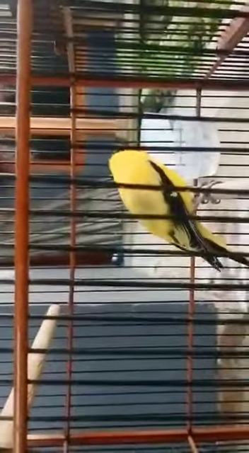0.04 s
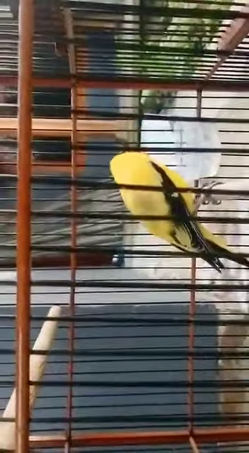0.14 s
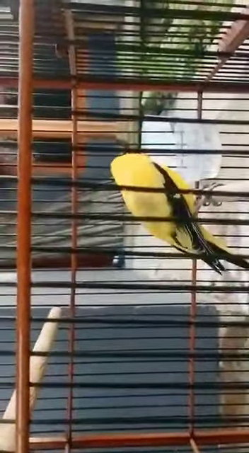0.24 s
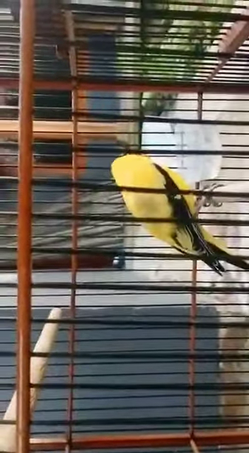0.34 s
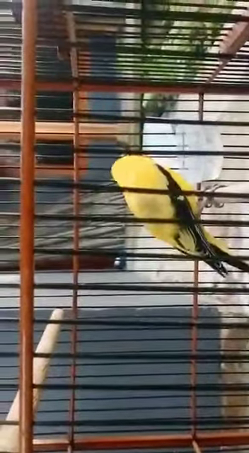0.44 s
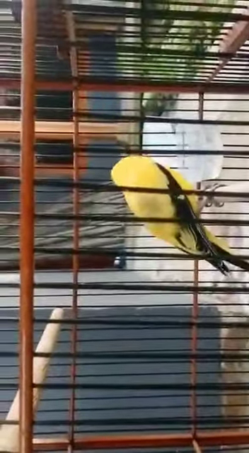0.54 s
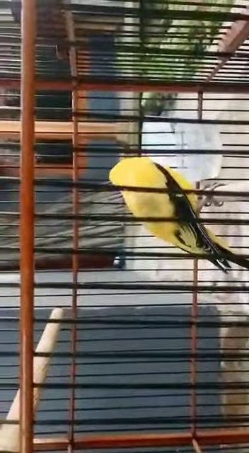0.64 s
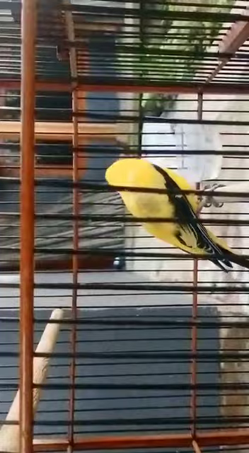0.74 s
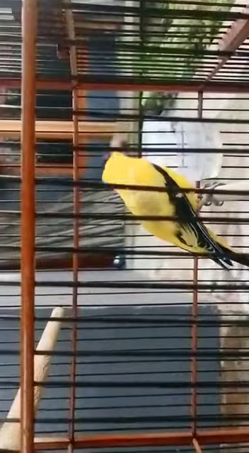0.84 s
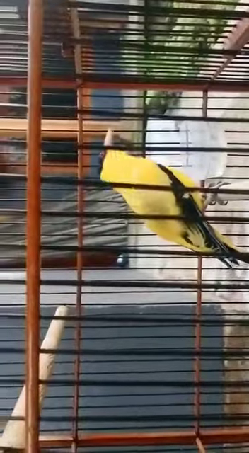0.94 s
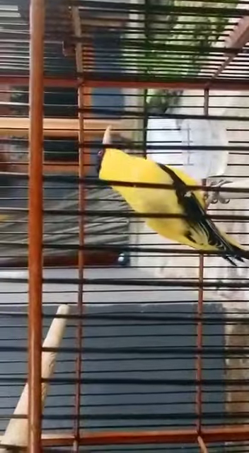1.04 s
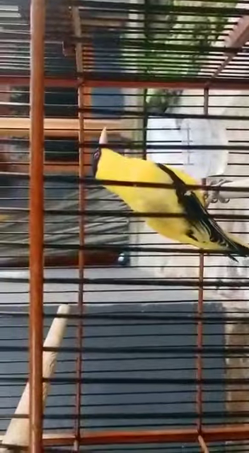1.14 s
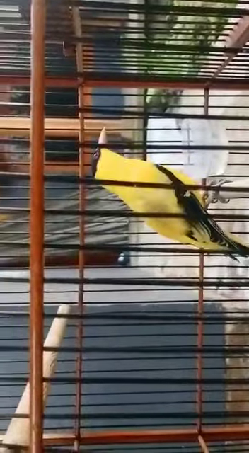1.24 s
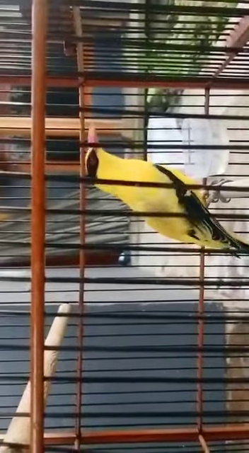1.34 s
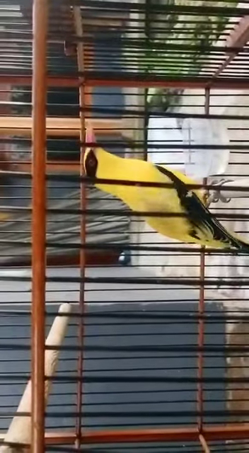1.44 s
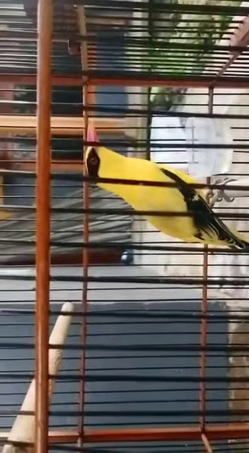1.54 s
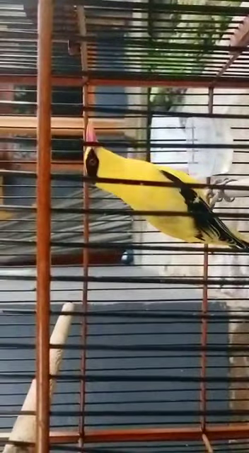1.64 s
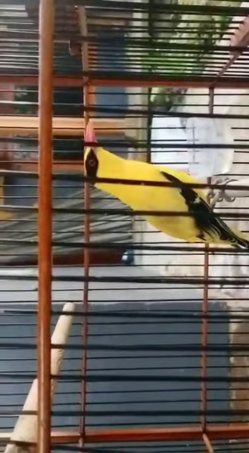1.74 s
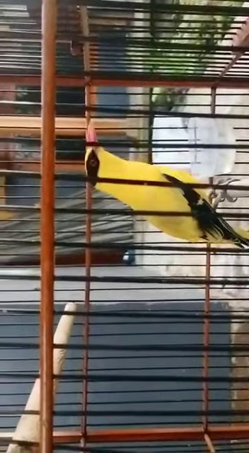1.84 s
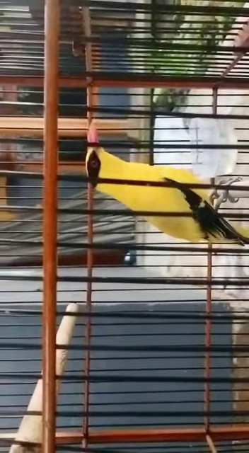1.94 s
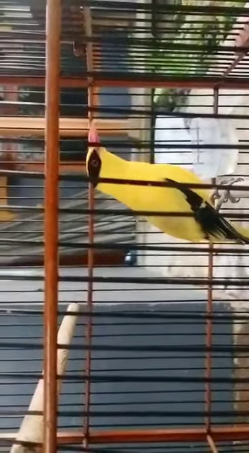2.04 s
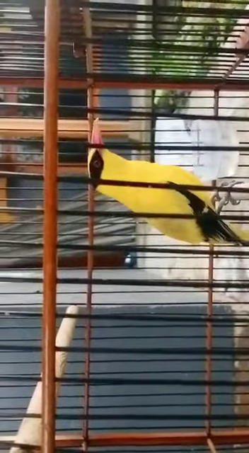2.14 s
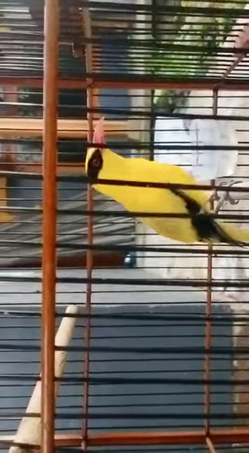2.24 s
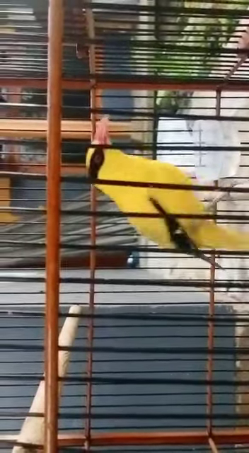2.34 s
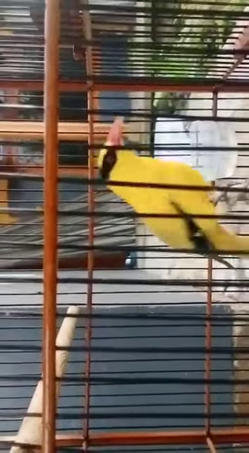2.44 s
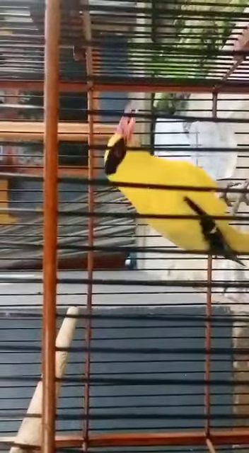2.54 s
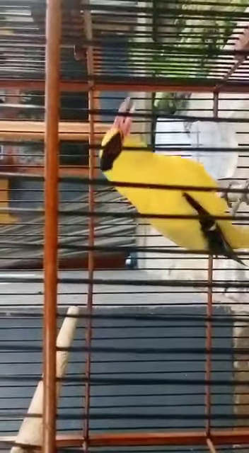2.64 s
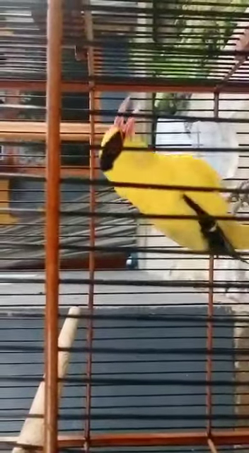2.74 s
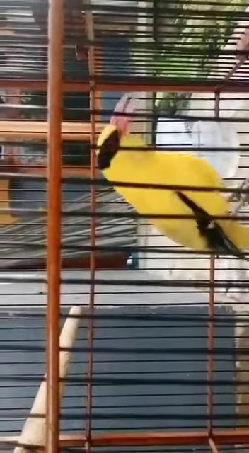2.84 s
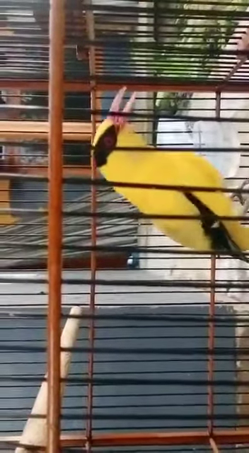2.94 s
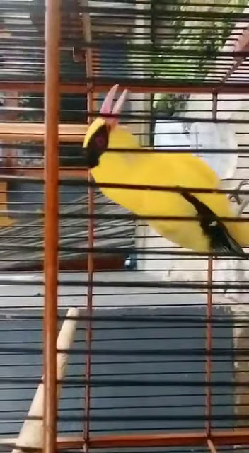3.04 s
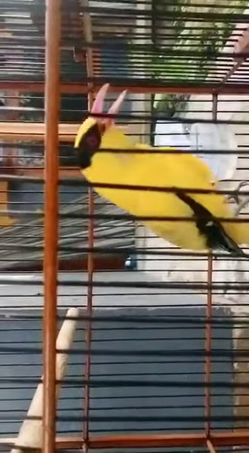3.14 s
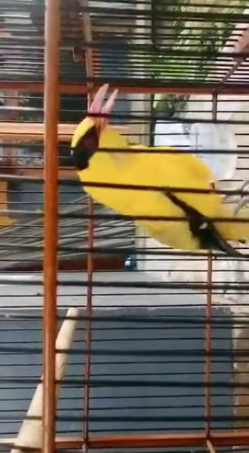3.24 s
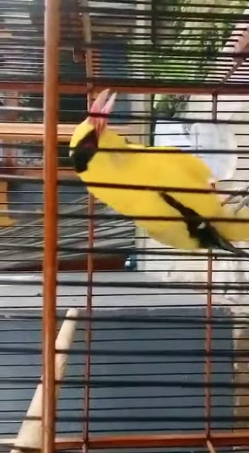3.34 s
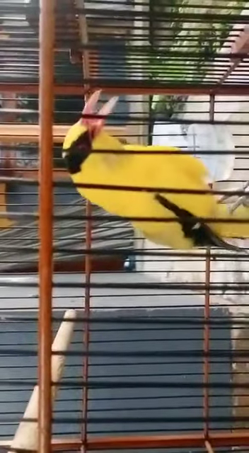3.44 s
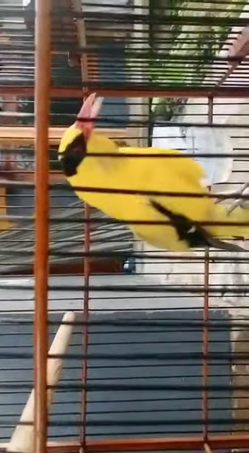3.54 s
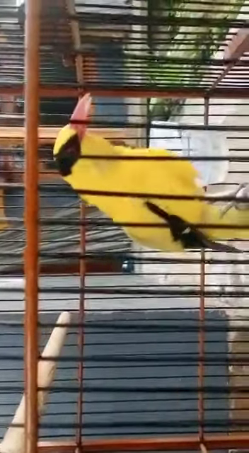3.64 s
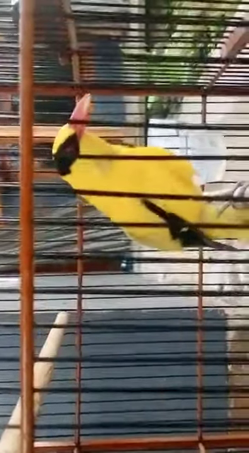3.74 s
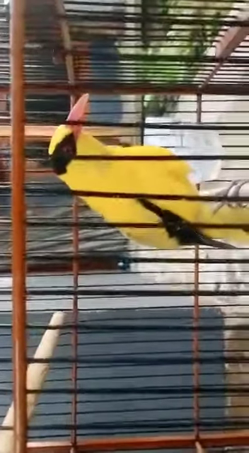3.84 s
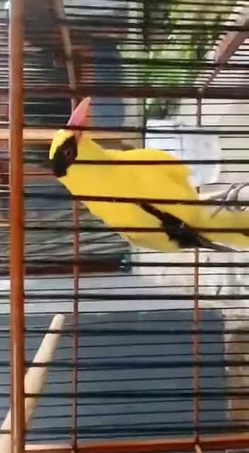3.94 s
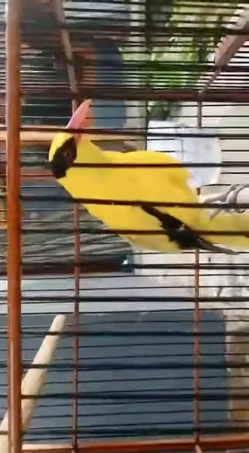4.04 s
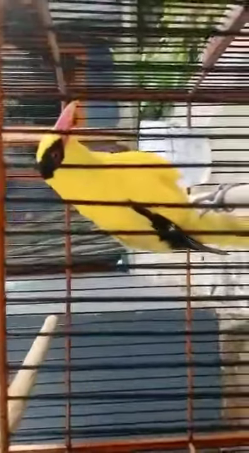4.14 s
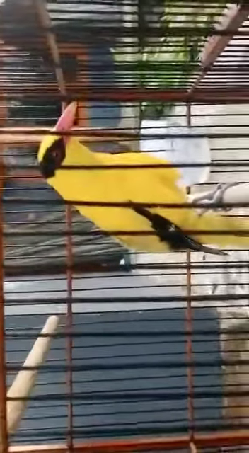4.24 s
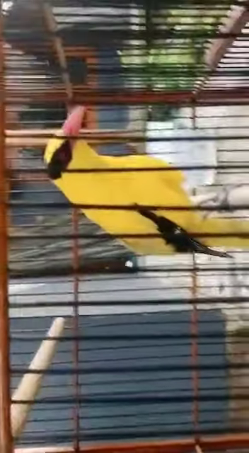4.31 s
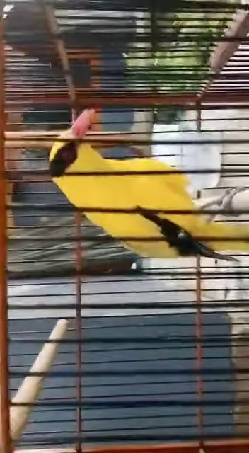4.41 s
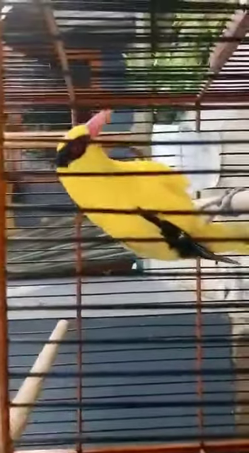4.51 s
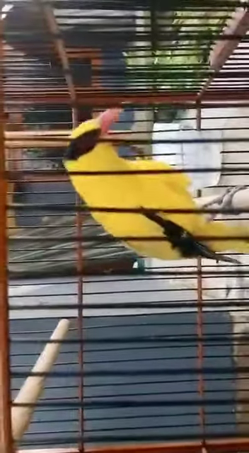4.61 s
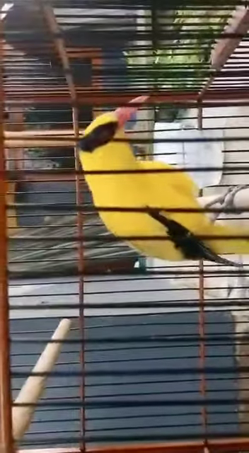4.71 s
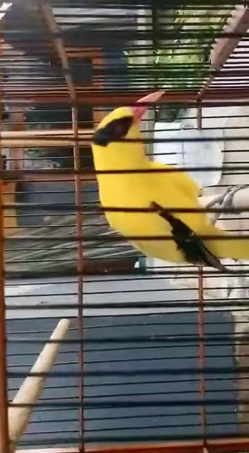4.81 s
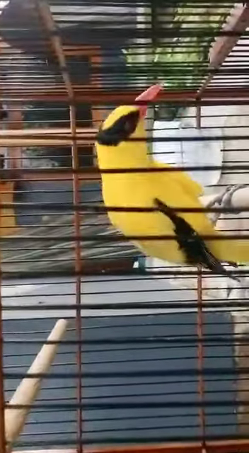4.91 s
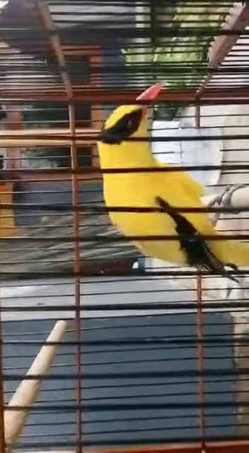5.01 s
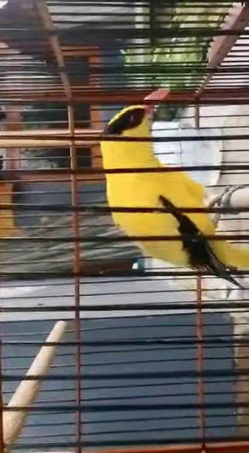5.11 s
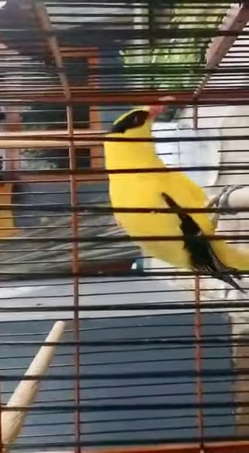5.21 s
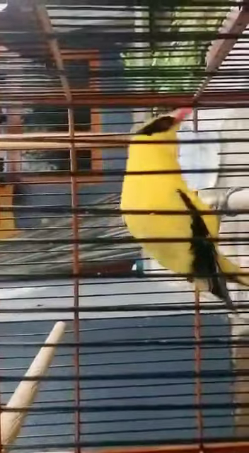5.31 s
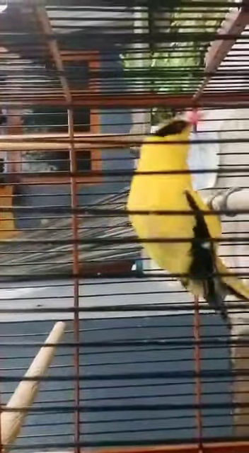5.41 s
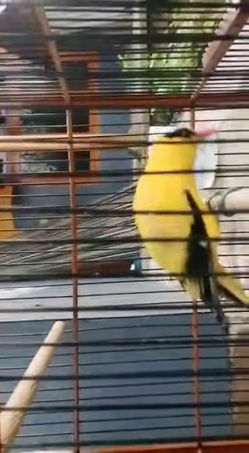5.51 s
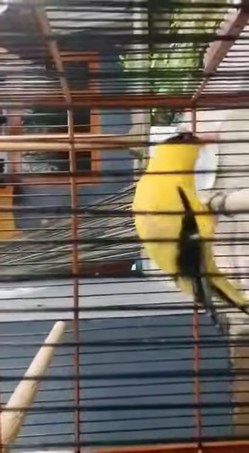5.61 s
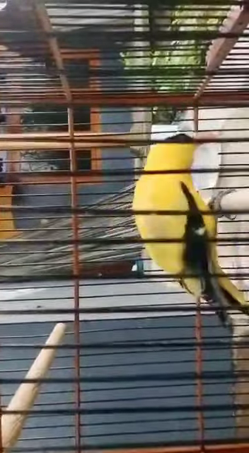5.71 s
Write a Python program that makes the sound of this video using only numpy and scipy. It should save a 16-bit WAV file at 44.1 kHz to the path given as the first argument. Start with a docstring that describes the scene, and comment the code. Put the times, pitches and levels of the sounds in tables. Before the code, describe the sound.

On a quiet porch, a dove coos softly in the background, a long rolled coo and a short one in turn. Midway, a caged oriole close to the microphone bursts into one loud fluty phrase, sliding up and down for about a second, with a slight porch echo. Tiny cage ticks and faint distant bird whistles dot the near silence.

```python
"""A porch: near the microphone a caged oriole whistles one loud fluty phrase with both sides of its syrinx,
near sines with faint overtones, rasp and a ringing windpipe. Behind it a dove coos softly, a rolled, falling
coo and a short one in turn: closed-beak tones, chopped where they roll. The cage ticks now and then in short
noise scratches. Wavering sine slurs make the whistles of far birds, and soft low tones and rising squeaks
around 1.5 s. A noise gate flutters on the faint outdoor hush of coloured noise."""
import sys
import numpy as np
from scipy import signal
from scipy.fft import rfft, irfft
from scipy.io import wavfile
from scipy.ndimage import uniform_filter1d, minimum_filter1d

SR = 44100
rng = np.random.default_rng(int(sys.argv[2]) if len(sys.argv) > 2 else 0)


def to_wav(s):
    """Save 16-bit WAV."""
    ch = np.atleast_2d(s).T  # columns
    pcm = np.round(np.clip(ch, -1, 1) * 32767)  # PCM
    wavfile.write(sys.argv[1], SR, pcm.astype(np.int16))


N = 254456


def amp(db):
    """Decibels to gain."""
    return 10 ** (np.asarray(db) / 20)


def unit(x):
    """Scales to rms 1."""
    return x / np.sqrt(np.mean(x ** 2) + 1e-20)


def read(points, hz):
    """Reads a spectrum on a log-frequency axis."""
    f, value = np.transpose(points)
    return np.interp(np.log(hz + 1), np.log(f + 1), value)


def follow(rows, t):
    """Reads every column of a curve table at the times t."""
    s, *columns = np.transpose(rows)
    return [np.interp(t, s, c) for c in columns]


def add(mix, s, sound):
    """Mixes a sound in at time s."""
    part = mix[max(round(s * SR), 0):][:len(sound)]
    part += sound[:len(part)]


def tinted(x, spectrum):
    """Gives a sound a colour and rms 1."""
    gain = amp(read(spectrum, np.fft.rfftfreq(len(x), 1 / SR)))
    return unit(irfft(rfft(x) * gain, len(x)))


def noise(spectrum, size):
    """Noise of rms 1 with the given colour."""
    return tinted(rng.standard_normal(size), spectrum)


def wander(rate_hz, size):
    """Smooth random motion, of rms 1 over two seconds, up to about the given rate."""
    hz = np.fft.rfftfreq(2 * SR, 1 / SR)
    spectrum = rfft(rng.standard_normal(2 * SR)) / (1 + (hz / rate_hz) ** 4)
    return unit(irfft(spectrum))[:size]


def soft_ends(t):
    """Fades a note in and out within a few milliseconds."""
    return np.clip(np.minimum(t - t[0], t[-1] - t) / 0.00301, 0, 1)


def resonate(x, hz, width):
    """A resonance of gain 1 that follows the curve hz: shifted to 0 Hz, smoothed and shifted back."""
    turn = np.exp(2j * np.pi * np.cumsum(hz) / SR)
    r = np.exp(-np.pi * width / SR)
    return 2 * (turn * signal.lfilter([1 - r], [1, -r], x / turn)).real


# Colour of the outdoor hush and microphone hiss. Each row: frequency in Hz, relative density in dB per Hz.
HUSH_COLOUR = [(25, -31), (60, -19.5), (110, 2), (165, 2), (260, -6), (700, -11.5), (1500, -16),
               (3800, -22), (4100, -12), (4400, -25.5), (6000, -29.5), (6900, -18), (8500, -38),
               (12000, -31), (15000, -24)]
HUSH_DB = -68


def hush():
    """Steady coloured noise: the air outdoors and the hiss of the microphone."""
    return amp(HUSH_DB) * noise(HUSH_COLOUR, N)


# Faint whistles and chirps: far birds' slurs, and soft low tones and rising squeaks around 1.5 s. Each row:
# start in seconds, length in seconds, first pitch in Hz, last pitch in Hz, level in dB before porch and mix.
FAINT_SLURS = [(0.023, 0.14, 3200, 2800, -81), (0.236, 0.15, 4550, 4350, -81.5),
               (0.872, 0.15, 3000, 2740, -75.5), (1.446, 0.039, 2150, 3040, -67.5),
               (1.452, 0.036, 2950, 3600, -68.5), (1.46, 0.026, 1600, 2200, -72),
               (1.469, .17, 608, 572, -72.5), (1.489, 0.14, 720, 710, -64.5),
               (1.545, 0.022, 1390, 2220, -64), (1.7, 0.15, 2780, 2900, -80.5),
               (2.843, .22, 2940, 3297, -63), (4.248, 0.16, 3300, 2720, -79.5),
               (4.517, 0.127, 2984, 2750, -76.5), (4.71, .11, 3186, 2860, -76),
               (4.87, .22, 3002, 2544, -81)]


def faint_whistles():
    """All the faint slurs, tones and squeaks."""
    whistles = np.zeros(N)
    for row in FAINT_SLURS:
        add(whistles, *faint_slur(*row))
    return whistles


def faint_slur(s, length, first_hz, last_hz, level_db, waver=0.014):
    """A short sine slur whose pitch wavers at random."""
    size = round(length * SR)
    hz = np.linspace(first_hz, last_hz, size) * (1 + waver * wander(130, size))
    tone = np.sin(2 * np.pi * np.cumsum(hz) / SR)
    return s, amp(level_db) * tone * signal.windows.tukey(size, .5)


# Small ticks of claws and wire. Each row: start in seconds, level in dB before the trim, ring in Hz.
CAGE_TICKS = [(0.6491, -55.5, 3000), (1.0411, -55, 1920), (1.071, -56.5, 1920), (1.809, -57, 1070),
              (2.297, -51.5, 1260), (3.8192, -54, 1212), (4.449, -54, 1856)]


def cage():
    """All the ticks of the cage."""
    ticks = np.zeros(N)
    for row in CAGE_TICKS:
        add(ticks, *tick(*row))
    return ticks


def tick(s, level_db, hz, t60=0.088, rise=0.00061, trim_db=-7.0, ring_db=14.0):
    """A short noise scratch that dies away, coloured by the wire that it shakes."""
    t = np.arange(SR // 6) / SR
    colour = [(150, -8), (hz * 0.87, 0), (hz, ring_db), (hz * 1.3, -2),
              (4000, -5), (5300, 0), (6500, -7), (16000, -10)]
    decay = amp(level_db + trim_db - 60 * t / t60)
    return s, decay * (1 - np.exp(-t / rise)) * noise(colour, len(t))


# The dove's second partial. Each row: frequency in Hz, level in dB relative to the tone.
DOVE_SECOND_PARTIAL = [(650, -12), (850, -28), (930, -22.5), (1030, -44.5), (1200, -36.5)]
ROLL_HZ = 27.15  # mean rate
ROLL_BEND = .07  # share of the pitch


def coo(rows, jitter=0.0036, roll_spread=0.15, roll_chop=0.53, rough=0.87):
    """A closed-beak tone of two partials; an uneven roll chops it and flicks its pitch up."""
    t = np.arange(rows[0][0], rows[-1][0], 1 / SR)
    hz, level_db, depth = follow(rows, t)
    roll = 2 * np.pi * np.cumsum(ROLL_HZ * (1 + roll_spread * wander(16, len(t)))) / SR
    flick = np.cos(roll) + np.cos(2 * roll) / 2
    bend = 1 + ROLL_BEND * depth * flick + jitter * wander(60, len(t))
    phase = 2 * np.pi * np.cumsum(hz * bend) / SR
    tone = np.sin(phase) + amp(read(DOVE_SECOND_PARTIAL, 2 * hz)) * np.sin(2 * phase)
    chop = 1 + depth * (roll_chop * np.sin(roll) + rough * wander(74, len(t)))
    return t[0], amp(level_db) * chop * tone * soft_ends(t)


# a long coo opens with a roll that climbs and grows
ROLL_TOP_HZ, ROLL_CLIMB_HZ_PER_S, ROLL_GROWTH_DB_PER_S, ROLL_DEPTH = 498, 180, 29, .85
# clear notes sag in pitch and swell towards their end; the roll flares up at each change of note
HIGH_HZ, HIGH_DB, MIDDLE_HZ, MIDDLE_DB = 570, -46, 553, -41
CREST_HZ, CREST_DB, CREST_LEAD_S = 542.3, -38.0, 0.073
LOW_HZ, LULL_HZ, LULL_DB, SWELL_HZ, SWELL_S = 476, 453, -58.5, 433.7, .11
LEAP_S, DROP_S, FLARE_DEPTH, LULL_DEPTH = .008, .025, 0.45, 0.11
SIGH_S, DYING_HZ_PER_S, DYING_DB = .06, 840, -70.0


def long_coo(start, leap, drop, swell, end, roll_db, drop_db, swell_db,
             ease_db=-5.5, ease_hz=9.0, sigh_db=-14.0, sigh_hz=40.0):
    """A climbing roll, a leap to a clear high note, then a lower note that swells and dies away."""
    roll = leap - start
    first_hz = ROLL_TOP_HZ - ROLL_CLIMB_HZ_PER_S * roll
    last_hz = SWELL_HZ - DYING_HZ_PER_S * (end - swell)
    # each row: time in seconds, pitch in Hz, level in dB, depth of the roll
    return coo([(start, first_hz, roll_db - ROLL_GROWTH_DB_PER_S * roll, ROLL_DEPTH),
                (leap - LEAP_S, ROLL_TOP_HZ, roll_db, ROLL_DEPTH),
                (leap, HIGH_HZ, HIGH_DB, FLARE_DEPTH),
                ((leap + drop - CREST_LEAD_S) / 2, MIDDLE_HZ, MIDDLE_DB, 0),
                (drop - CREST_LEAD_S, CREST_HZ, CREST_DB, 0),
                (drop - DROP_S, CREST_HZ - ease_hz, CREST_DB + ease_db, 0),
                (drop, LOW_HZ, drop_db, FLARE_DEPTH),
                (swell - SWELL_S, LULL_HZ, LULL_DB, LULL_DEPTH),
                (swell, SWELL_HZ, swell_db, 0),
                (swell + SIGH_S, SWELL_HZ - sigh_hz, swell_db + sigh_db, FLARE_DEPTH),
                (end, last_hz, DYING_DB, FLARE_DEPTH)])


# a short coo starts on a brief higher accent
ACCENT_HZ, ACCENT_DB, ACCENT_S, ACCENT_DIP_DB = 596.5, -40.5, 0.0344, -45
SHORT_CREST_HZ, SHORT_CREST_DB, SHORT_LEAD_S, SHORT_EDGE_HZ, SILENT_DB = 538, -43, 0.032, 250, -74


def short_coo(leap, drop, end, roll_db=-56.0):
    """A quick rise to an accent, the sagging high note, and a brief fading roll."""
    return coo([(leap - SHORT_LEAD_S, SHORT_EDGE_HZ, SILENT_DB, ROLL_DEPTH),
                (leap - LEAP_S, ROLL_TOP_HZ, roll_db, ROLL_DEPTH),
                (leap, ACCENT_HZ, ACCENT_DB, LULL_DEPTH),
                (leap + ACCENT_S, ACCENT_HZ, ACCENT_DB, LULL_DEPTH),
                (leap + ACCENT_S + DROP_S, HIGH_HZ, ACCENT_DIP_DB, LULL_DEPTH),
                (drop - DROP_S, SHORT_CREST_HZ, SHORT_CREST_DB, 0),
                (drop, ROLL_TOP_HZ, roll_db, FLARE_DEPTH),
                (end, LOW_HZ, SILENT_DB, FLARE_DEPTH)])


# The dove's long coos. Each row: start in seconds, leap to the high note in seconds, drop to the low note in
# seconds, last swell in seconds, end in seconds, top of the roll in dB, drop in dB, last swell in dB.
DOVE_LONG_COOS = [(0, 0.22, 0.46, .805, .97, -55.5, -52, -46.5),
                  (2.111, 2.559, 2.795, 3.115, 3.27, -52.5, -58.5, -43.5),
                  (4.51, 5.002, 5.205, 5.47, 5.57, -52, -55, -49)]
# Its short coos. Each row: leap in seconds, drop in seconds, end in seconds.
DOVE_SHORT_COOS = [(1.745, 1.91, 2.01), (4.148, 4.32, 4.43)]


def dove():
    """Long and short coos in turn."""
    coos = np.zeros(N)
    for row in DOVE_LONG_COOS:
        add(coos, *long_coo(*row))
    for row in DOVE_SHORT_COOS:
        add(coos, *short_coo(*row))
    return coos


# Overtones let through by throat and open beak. Each row: frequency in Hz, level in dB relative to the tone,
# before the brightness of the note.
THROAT_COLOUR = [(1600, -8), (2000, -26), (2450, -37), (2900, -44.5), (3350, -36.5), (4200, -54),
                 (4900, -47), (5750, -42), (7100, -46.5), (8600, -56), (11200, -49), (12200, -56),
                 (13200, -45), (15400, -46)]
# Colour of the rasp. Each row: frequency in Hz, relative level in dB.
RASP_COLOUR = [(100, -33.5), (400, -22.5), (900, -3.5), (1750, 4), (2600, -4), (4100, -28), (5000, -19.5),
               (7400, -20), (8800, -27.5), (10500, -21.5), (12000, -28), (13400, -13), (15500, -21.5)]
JITTER, STRAIN_JITTER = .0014, .045  # share of the pitch: always, and added per unit of rasp
# the windpipe's resonance sinks as the neck stretches
PIPE_SHORT_HZ, PIPE_LONG_HZ, STRETCH_AT_S, STRETCH_S = 7340, 5990, 3.02, .05


def whistle(t, hz, level_db, bright_db, harsh_db, pipe_db,
            flutter_db=7.5, pipe_width_hz=680.0, pipe_rasp_db=12.5):
    """One side of the syrinx: a near sine with faint overtones, unsteady and raspy when pressed."""
    shake = (JITTER + STRAIN_JITTER * amp(harsh_db)) * wander(300, len(t))
    phase = 2 * np.pi * np.cumsum(hz * (1 + shake)) / SR
    overtones = np.zeros(len(t))
    for k in range(2, 22):
        unsteady_db = flutter_db * (1 - 1 / k) ** 2 * wander(50, len(t))  # high overtones flicker most
        gain = amp(read(THROAT_COLOUR, k * hz) + bright_db + unsteady_db)
        overtones += gain * (k * hz < SR / 2) * np.sin(k * phase)
    # air escapes in puffs, once a cycle
    puffs = rng.standard_normal(len(t)) * (1 + np.cos(phase))
    rasp = amp(harsh_db) * tinted(puffs, RASP_COLOUR) / 2
    # the windpipe rings at one high pitch, sharpened by passing the resonance twice
    stretch = 1 / (1 + np.exp((t - STRETCH_AT_S) / STRETCH_S))  # 1 for a short neck, 0 for a long one
    pipe_hz = PIPE_LONG_HZ + (PIPE_SHORT_HZ - PIPE_LONG_HZ) * stretch
    pipe = overtones + amp(pipe_rasp_db) * rasp
    for _ in range(2):
        pipe = resonate(pipe, pipe_hz, pipe_width_hz)
    sound = np.sin(phase) + overtones + rasp + amp(pipe_db) * pipe
    return t[0], amp(level_db) * sound * soft_ends(t)


def note(start, length, first_hz, last_hz, arch_hz, level_db, swell_db, attack, release,
         bright_db, harsh_db, pipe_db):
    """A short whistle: one arched glide that swells or fades between attack and release."""
    t = np.arange(0, length, 1 / SR)
    u = t / length
    hz = first_hz + (last_hz - first_hz) * u + arch_hz * np.sin(np.pi * u)
    opening = np.clip(np.minimum(t / attack, (length - t) / release), 0, 1)
    s, sound = whistle(start + t, hz, level_db + swell_db * (u - .5), bright_db, harsh_db, pipe_db)
    return s, sound * np.sin(np.pi / 2 * opening) ** 2


# a fast glide strains the voice: brighter and raspier; low notes are raspier too
HALF_STRAIN_OCT_PER_S = 3.8
SLUR_DB, SLUR_PIPE_DB = 4, 2
CALM_OVERTONES_DB, STRAIN_OVERTONES_DB = -4.5, 6.0
CALM_RASP_DB, STRAIN_RASP_DB, RASP_DB_PER_OCT, CLEAR_HZ = -60.0, 28.0, 19.0, 1400
# soft passages are purer; only the windpipe keeps ringing
FULL_VOICE_DB, PURER_DB_PER_DB = -18.5, 0.9
# The voice cracks where the bird presses hardest or jumps in pitch. Each row: centre in seconds, half length
# in seconds, rasp in dB, windpipe in dB.
VOICE_CRACKS = [(2.672, .038, -24.5, 13.5), (3.368, .012, -28, 11), (3.449, 0.01, -7.5, 9)]


def slur(rows):
    """A long whistle whose colour follows its loudness and the speed of its glide."""
    t = np.arange(rows[0][0], rows[-1][0], 1 / SR)
    hz, level_db = (uniform_filter1d(c, size=180, mode="nearest") for c in follow(rows, t))
    speed = uniform_filter1d(abs(np.gradient(np.log2(hz))) * SR, size=500)  # octaves per second
    strain = speed ** 2 / (speed ** 2 + HALF_STRAIN_OCT_PER_S ** 2)
    purity_db = PURER_DB_PER_DB * np.maximum(FULL_VOICE_DB - level_db, 0) * (1 - strain)
    bright_db = CALM_OVERTONES_DB + STRAIN_OVERTONES_DB * strain - purity_db
    harsh_db = CALM_RASP_DB + STRAIN_RASP_DB * strain + RASP_DB_PER_OCT * np.log2(CLEAR_HZ / hz)
    pipe_db = SLUR_PIPE_DB + purity_db
    for s, half_length, rasp_db, ring_db in VOICE_CRACKS:
        crack = np.exp(-((t - s) / half_length) ** 4)
        harsh_db = harsh_db + crack * (rasp_db - harsh_db)
        pipe_db = pipe_db + crack * (ring_db - pipe_db)
    return whistle(t, hz, level_db + SLUR_DB, bright_db, harsh_db, pipe_db)


# The oriole's short notes. Each row: start in seconds, length in seconds, # first pitch in Hz, last pitch in
# Hz, arch in Hz, level in dB, swell in dB, attack in seconds, release in # seconds, overtones in dB, rasp in
# dB, windpipe in dB.
SHORT_NOTES = [(2.639, .034, 1576, 1407, 0, -16, -3, 0.013, 0.01, -4, -23.5, 13),
               (2.839, 0.071, 950, 1300, -270, -35.5, 12, 0.0045, 0.0078, -14.5, -45, 12.5),
               (2.884, 0.05, 1550, 1376, 15, -18.5, 0, 0.031, 0.025, -17, -47, 13),
               (2.958, .066, 1236, 1095, 30, -9, 0, .03, .018, -4.5, -50.5, -3.5),
               (3.018, 0.11, 1130, 1108, 5, -27, -18.5, 0.013, 0.0095, -15, -43.5, 12)]
# The long whistles. Each row: time in seconds, pitch in Hz, level in dB before the slur's gain.
# the opening whistle, which climbs and swells
OPENING_WHISTLE = [(2.574, 1630, -48.5), (2.582, 1637, -34.5), (2.618, 1671, -45), (2.638, 1824, -38.5),
                   (2.652, 1881, -24.5), (2.662, 1934, -26), (2.674, 1904, -16), (2.692, 1871, -17),
                   (2.738, 1851, -39.5)]
# a softly held whistle that swells and falls; rows as above: seconds, Hz, dB
FALLING_WHISTLE = [(3.023, 1509, -53), (3.031, 1511, -35), (3.053, 1506, -28), (3.103, 1502, -30),
                   (3.133, 1498, -23.5), (3.163, 1490, -8), (3.193, 1430, -8), (3.217, 1344, -22.5),
                   (3.223, 1325, -14.5), (3.251, 1135, -11.5), (3.277, 959, -17.5), (3.285, 887, -26.5),
                   (3.3, 790.7, -54.5)]
# a whistle that rises in two steps; rows as above: seconds, Hz, dB
RISING_WHISTLE = [(3.308, 581.1, -48), (3.324, 655, -37.5), (3.336, 853, -27), (3.36, 880, -21),
                  (3.372, 1103, -16), (3.38, 1254, -20.5), (3.386, 1352, -10), (3.402, 1381, -7),
                  (3.43, 1390, -6), (3.446, 1396, -27.5), (3.452, 1400, -22.5)]
# the last whistle, which falls and levels out; rows as above: seconds, Hz, dB
LAST_WHISTLE = [(3.447, 1421, -29), (3.457, 1378, -11.5), (3.469, 1303, -11), (3.481, 1258, -17),
                (3.497, 1206, -10), (3.527, 991, -15.5), (3.577, 840.3, -18), (3.599, 824.8, -18),
                (3.679, 807.5, -21), (3.689, 770, -29.5), (3.704, 692, -41.5)]


def song(sum_db=-17.0, cross_db=-12.5):
    """The oriole: two sides of the syrinx that, sounding together, modulate each other."""
    low, high = np.zeros((2, N))
    for row in SHORT_NOTES:
        add(low, *note(*row))
    add(low, *slur(RISING_WHISTLE))
    for rows in (OPENING_WHISTLE, FALLING_WHISTLE, LAST_WHISTLE):
        add(high, *slur(rows))
    both = low + high
    return both + low * high * (amp(sum_db) + amp(cross_db) * both)


# Ring of the porch. Each row: frequency in Hz, decay by 60 dB in seconds, relative tail level in dB.
PORCH_RING = [(480, 0.55, -15), (820, 0.27, -25.5), (1237, .42, -13), (1800, 0.4, -23), (5000, 0.19, -13),
              (15000, 0.18, -8.5)]
# Echoes from the floor and walls. Each row: delay in seconds, relative level in dB.
WALL_ECHOES = [(0.012, -14.5), (.0225, -20.5), (.0335, -22), (0.054, -30.5)]


def porch(x, tail_db, walls_db):
    """The direct sound, a few wall echoes and a diffuse tail; treble, beamed at the roof, is wettest."""
    taps = rng.choice([-1., 1.], SR) * (rng.random(SR) < 3000 / SR)  # about 3000 random echoes
    hz, t, z = signal.stft(unit(taps), SR, nperseg=256)
    t60, wet_db = (read(np.array(PORCH_RING)[:, [0, k]], hz)[:, None] for k in (1, 2))
    # the root evens out the energy of long and short decays
    decay = np.sqrt(np.log(1e6) / (t60 * SR)) * amp(-60 * t / t60)
    tail = z * decay * amp(wet_db + tail_db) * np.minimum(t / .008, 1)
    response = signal.istft(tail, SR, nperseg=256)[1]
    response[0] += 1
    for delay, db in WALL_ECHOES:
        response[round(delay * SR)] += amp(db + walls_db)
    return signal.fftconvolve(x, response)[:N]


def scene():
    """Hush, faint whistles, cage, dove and oriole; the fainter layers get more of the porch's tail."""
    faint = amp(-2.0) * porch(faint_whistles(), tail_db=22.0, walls_db=1.5)
    behind = porch(dove(), tail_db=8.5, walls_db=-3.0)
    near = porch(song() + cage(), tail_db=1.5, walls_db=1.0)
    return (near + behind + faint + hush())[None]


EDGE_HZ = 15780  # top of the recorded band


def record(dry, threshold_db=-68.0, slope=9.3, deepest_db=20., ceiling_db=-3.8):
    """A fast noise gate dips the quietest moments, a limiter holds down the loudest; then the band limit."""
    power_db = 10 * np.log10(abs(uniform_filter1d(dry[0] ** 2, size=400)) + 1e-12)
    dip_db = np.clip(slope * (threshold_db - power_db), 0, deepest_db)
    gate = amp(-uniform_filter1d(dip_db, size=150))
    headroom = minimum_filter1d(np.minimum(amp(ceiling_db) / (abs(dry[0]) + 1e-9), 1), size=300)
    held = dry * gate * uniform_filter1d(headroom, size=200)
    lowpass = signal.firwin(511, EDGE_HZ, window=("kaiser", 9), fs=SR)
    return signal.oaconvolve(held, lowpass[None], "same")


dry = scene()
out = record(dry)
to_wav(out)
```